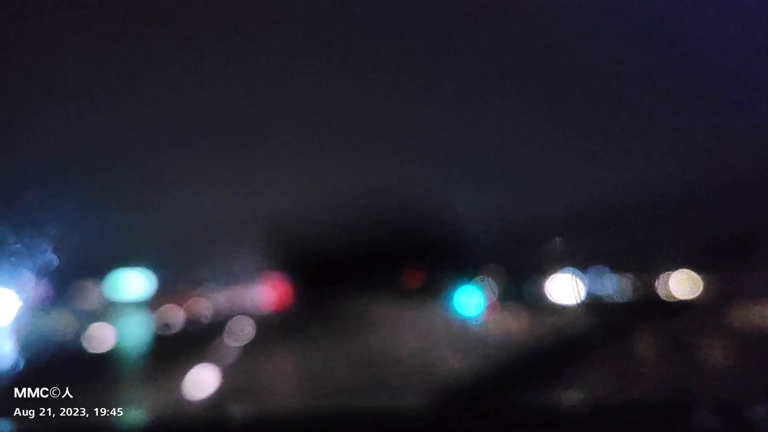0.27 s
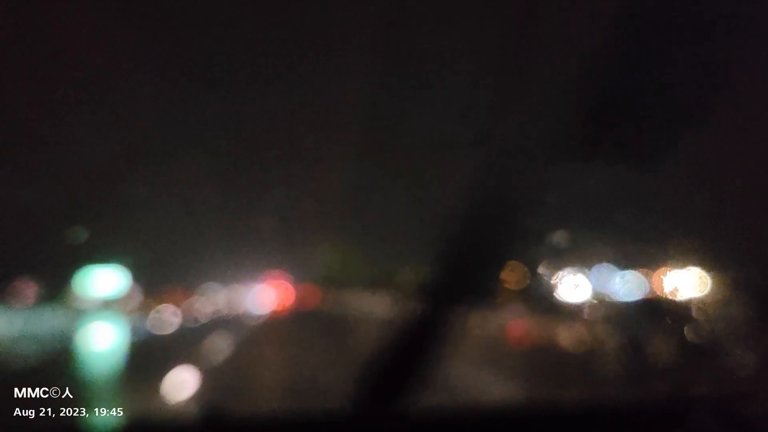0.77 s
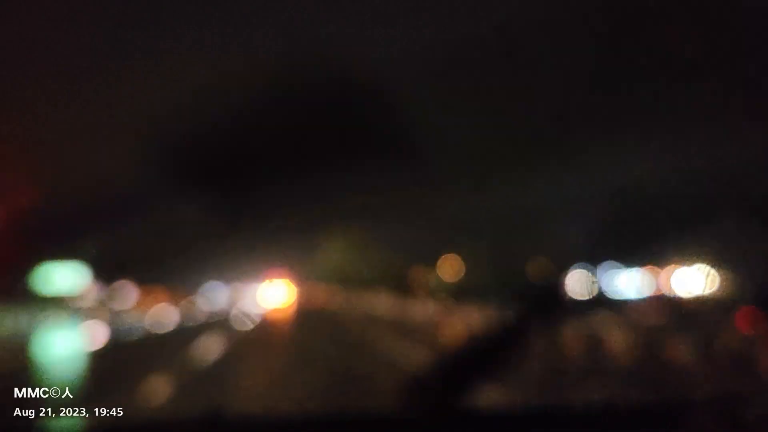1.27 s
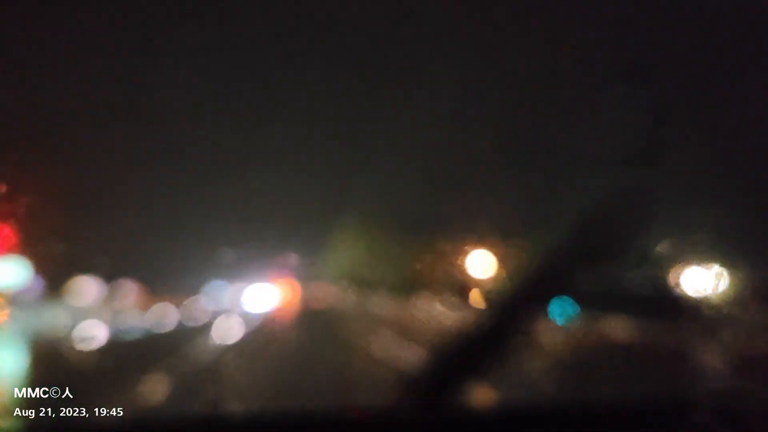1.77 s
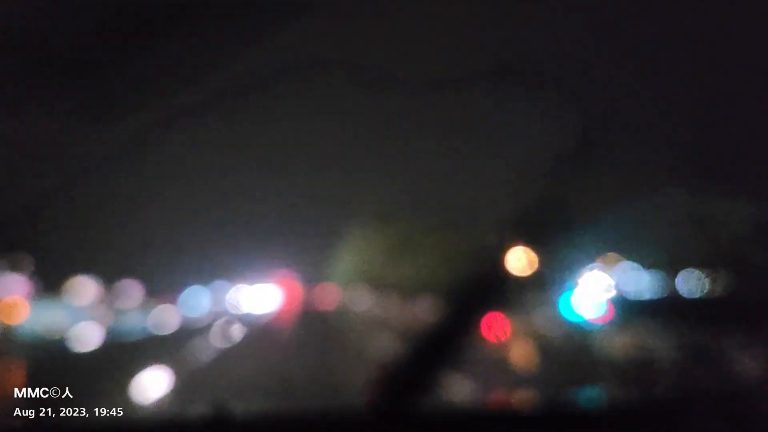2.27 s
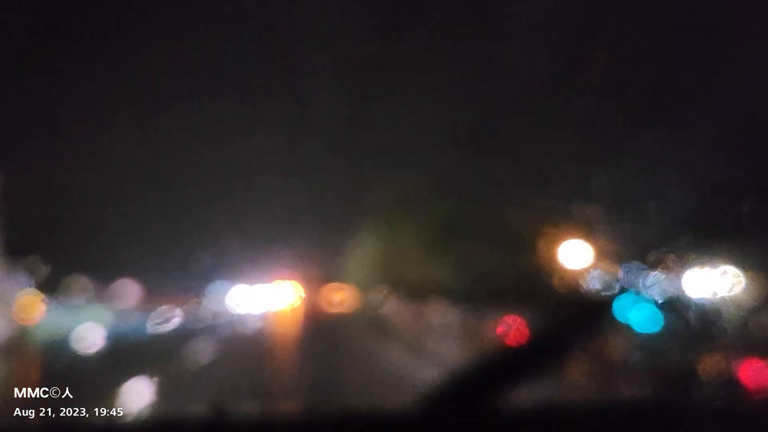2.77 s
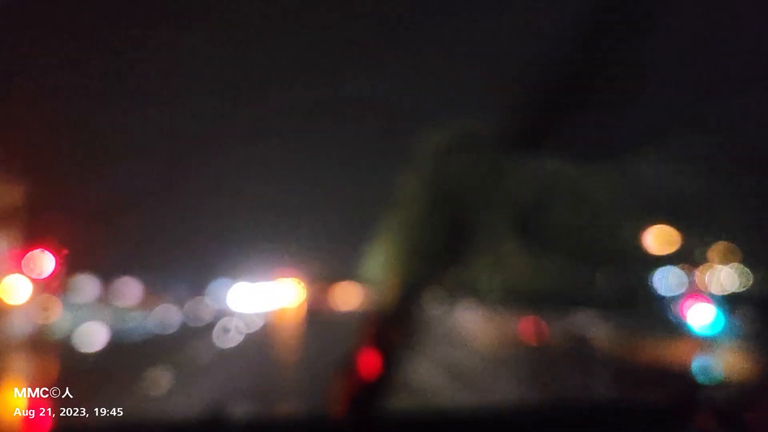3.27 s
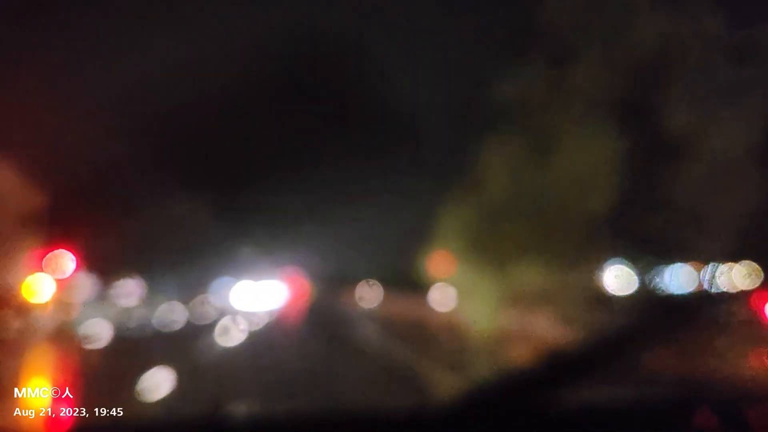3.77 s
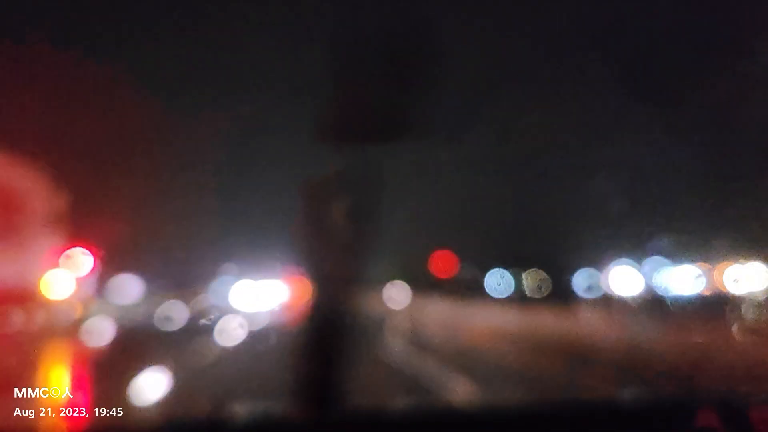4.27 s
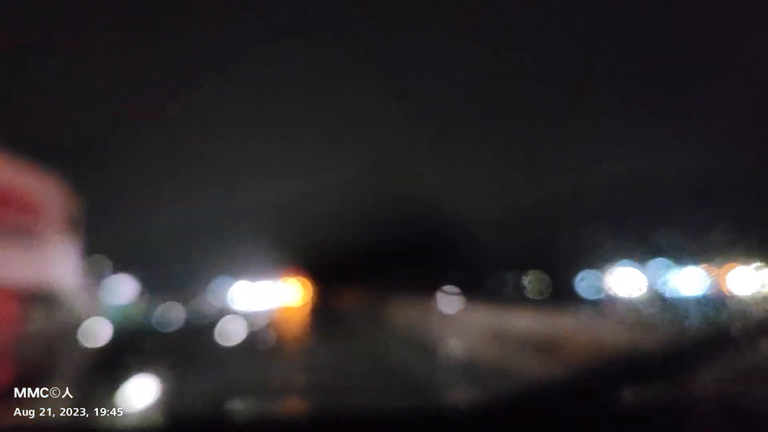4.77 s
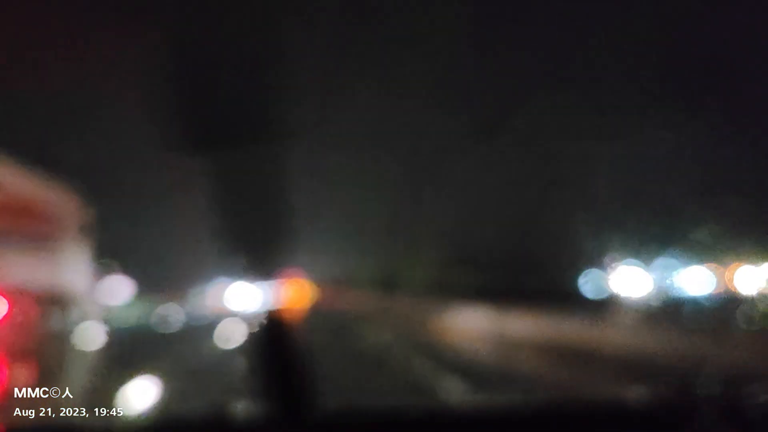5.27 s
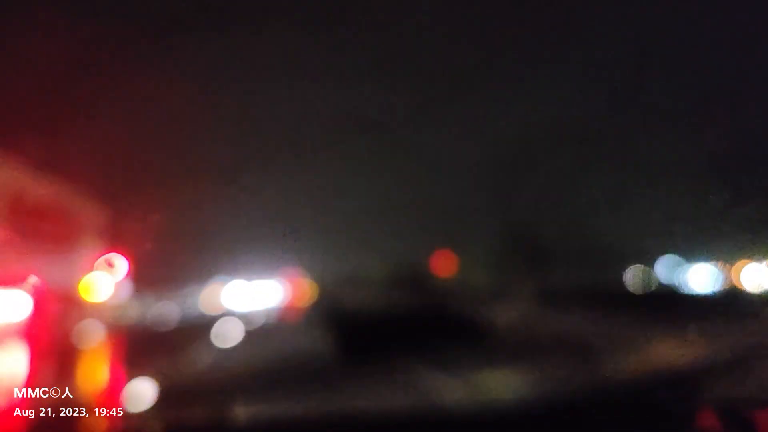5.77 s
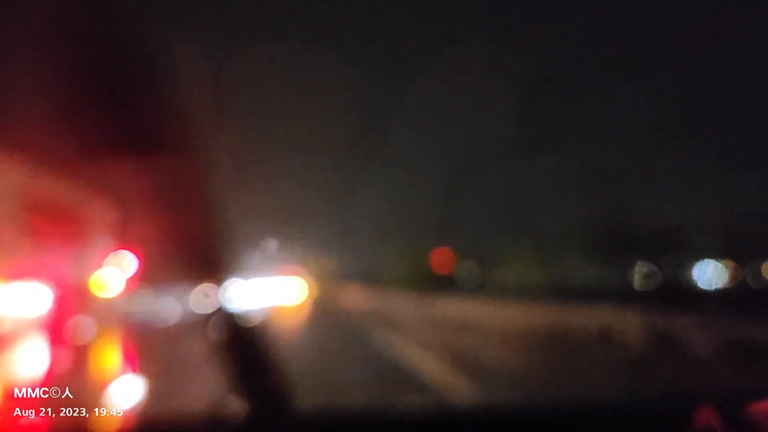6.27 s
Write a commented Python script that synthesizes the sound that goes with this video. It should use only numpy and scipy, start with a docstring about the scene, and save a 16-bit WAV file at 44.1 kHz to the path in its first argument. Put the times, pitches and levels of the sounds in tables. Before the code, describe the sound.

Inside a car driving through a downpour, dense drops patter on metal and glass while deep rumbles swell and fade with bumps.

```python
"""Inside the cabin of a moving car at night, in heavy rain.
Countless drops, made as short random bursts, drum on the roof and spatter on the glass; a few large ones tick.
Rough stretches of wet road make a noise rumble swell and fade, with firm thumps from damped tones.
Narrow noise booms as the car heaves, and a wavering tone drones and throbs underneath.
The tyres roar as shaped noise, and early on a faint low tone glides down and back up."""
import sys
import numpy as np
from scipy import signal
from scipy.fft import rfft, irfft
from scipy.io import wavfile
from scipy.ndimage import uniform_filter1d

SR = 44100
rng = np.random.default_rng(int(sys.argv[2]) if len(sys.argv) > 2 else 0)


def materialize(psi):
    """Save the field psi as 16-bit PCM at rate SR to the path in sys.argv[1].

    A 1-D psi becomes a single channel; in a 2-D psi each row is a channel.
    """
    bounded = np.clip(np.atleast_2d(psi).T, -1, 1)
    quanta = np.round(bounded * 32767).astype(np.int16)
    wavfile.write(sys.argv[1], SR, quanta)


N = 286650  # length in samples: 6.5 s

TIME, FREQS = np.arange(N) / SR, np.fft.rfftfreq(N, 1 / SR)  # s, Hz
BURST_TIME = np.arange(600) / SR  # s

# Levels are relative: the functions below may add a fixed number of dB.
# rain heard through the roof: (frequency [Hz], level per Hz [dB])
ROOF_COLOUR = [(200, -34), (420, -7), (520, 2.5), (600, -2), (680, -8), (870, -4.5), (1000, -3), (1200, -1),
               (1330, -6), (1680, -8), (2100, -5.5), (2550, -8), (3300, -11.5), (4500, -32.5), (7000, -56)]
# rain heard through the glass: (frequency [Hz], level per Hz [dB])
GLASS_COLOUR = [(1500, -5.5), (3000, -6.5), (4200, 3.5), (4900, -1), (6600, 1), (7200, -3.5), (7900, -11),
                (9000, -10), (9800, -7.5), (10500, -17.5), (11600, -6.5), (12050, -40), (12800, -52),
                (15500, -60)]
# resonances of the car's panels: (frequency [Hz], width [Hz], lift [dB])
PANELS = [(736.5, 54, 7), (977, 48, 3.5), (1047, 110, 4), (1150, 65, 3.5), (1467, 110, 3.5),
          (1784, 26, 3.5), (1875, 94, 4), (3280, 730, 3.5), (6430, 520, 1.5), (8250, 190, 5.5)]
# gusts of harder rain: (peak time [s], half length [s], lift on the glass [dB])
GUSTS = [(1.15, 0.54, 1.5), (2.422, 0.14, 1.5), (2.918, 0.11, 0.5), (3.845, 0.08, 2.0), (4.196, 0.099, 2.7),
         (4.628, 0.086, 2), (5.248, 0.13, 1.2), (5.81, 0.09, 1)]
ROOF_DB, GLASS_DB = -32, -38.5  # drumming and spatter between gusts
ROOF_GUST_SHARE = 0.47  # the roof gets this share of a gust's lift
# the finest spray lies above SPRAY_HZ; it gets an extra share of each gust, and flickers
SPRAY_HZ, SPRAY_GUST_SHARE, SPRAY_FLICKER_DB = 7000, 0.4, 1.07

# large drops on the windshield:
# (time [s], level [dB], extra level of the splash [dB], left over right [dB])
TICKS = [(0.0329, -14.5, -4.5, 5), (1.0256, -22.5, -3, 4), (1.0668, -23, -7, -1), (1.4704, -29, -9, 4),
         (1.651, -32, -5, 5), (2.626, -35, 5, -3), (2.8247, -28.5, 1.5, 7), (2.9302, -25.5, -10, 9),
         (2.9703, -30, 1, 3), (4.1353, -22, -7, 3), (5.359, -31, -1, 8), (6.3038, -24, -18, -2)]
# a large drop's knock on the pane: (frequency [Hz], level per Hz [dB])
KNOCK_COLOUR = [(900, -15), (1700, 0), (2600, 8), (3600, 4.5), (4800, 0), (6400, 2), (8000, -13),
                (13000, -58)]
# a large drop's bright splash: (frequency [Hz], level per Hz [dB])
SPLASH_COLOUR = [(3000, -6), (6500, -2.5), (8300, 2), (10000, -2.5), (12000, -10), (15500, -42)]
KNOCK_DECAY_S, SPLASH_DECAY_S = 0.00096, 0.00072
KNOCK_LAG_S = 0.0007  # the pane answers just after the splash

# bumps in the road: (time [s], level [dB], pitch of the thump [Hz])
BUMPS = [(0.29, -22, 243), (0.455, -13.5, 202), (1.586, -16, 246), (1.658, -24, 163), (1.76, -20, 227),
         (1.992, -19, 229), (2.346, -16, 231), (2.539, -12, 154), (2.604, -14.5, 175), (3.137, -15.5, 230),
         (3.522, -16, 208), (3.867, -14, 165), (3.92, -13, 231), (3.964, -16, 174), (4.218, -7.5, 135),
         (4.26, -16.5, 215), (4.358, -9.5, 148), (4.403, -10.5, 100), (4.527, -15, 159), (4.585, -8, 88),
         (4.636, -15.5, 182.6), (4.672, -13.5, 62), (5.129, -15, 226), (5.26, -11.5, 244),
         (5.325, -11, 191), (5.504, -11.5, 164), (5.695, -15.5, 252), (5.89, -9, 133), (5.925, -9.5, 172.6),
         (6.035, -10.5, 216), (6.051, -2.5, 78), (6.115, -12, 200.5), (6.326, -9.5, 133)]
# rough stretches of road:
# (start [s], length [s], shaking [dB], lift of its upper rattle [dB])
ROUGH_STRETCHES = [(-0.04, 0.073, -21, 8.5), (0.428, 0.14, -26, 1), (1.134, 0.47, -29, -10),
                   (1.533, 0.51, -23, 2.5), (2.39, 0.56, -23, 1), (3.075, 0.59, -29, -3),
                   (3.78, 0.25, -24.5, 7), (4.162, 0.5, -22.5, 2), (5.08, 0.32, -23, 5.5),
                   (5.386, 0.22, -24, 3), (5.66, 0.21, -27, 4), (5.83, 0.33, -20.5, -1),
                   (6.212, 0.22, -23, 1)]
SMOOTH_DB = -35.5  # shaking on the smooth road, always present
ROUGH_RISE_S, ROUGH_FADE_S = 0.052, 0.039
# rumble of the shaken body: (frequency [Hz], level per Hz [dB])
RUMBLE_COLOUR = [(8, -42), (16, 6.5), (28, -13), (48, -2), (78, 5), (103, 3), (130, 0.5), (185, -3),
                 (260, -10), (350, -15), (470, -20.5), (620, -24.5), (900, -28), (1500, -96.5)]
RATTLE_HZ = 328  # the upper rattle lies above this
LUMPS_DB, LUMPS_PER_S = 2.5, 18  # the rumble comes in uneven lumps
# deep shudder of the body on rough road: (frequency [Hz], width [Hz], level [dB])
SHUDDER = (31, 26, -6.5)
# booming resonance of the body: (frequency [Hz], width [Hz], level [dB])
BOOM = (45.9, 7.2, -0.6)
# the body heaves on its springs: (peak time [s], half length [s], level [dB])
HEAVES = [(0.123, 0.094, -18), (0.413, 0.093, -18), (0.896, 0.23, -27), (1.11, 0.05, -18.5),
          (1.338, 0.062, -17), (1.677, 0.036, -13.5), (1.85, 0.039, -12.5), (2, 0.047, -14.5),
          (2.255, 0.17, -23.5),  (2.877, 0.05, -16), (3.497, 0.094, -25), (3.74, 0.038, -22),
          (3.968, 0.33, -20.5), (4.297, 0.035, -13.5), (4.406, 0.014, -9), (4.582, 0.045, -18),
          (4.682, 0.018, -11.5), (5.305, 0.042, -13.5), (5.454, 0.028, -14), (5.78, 0.076, -22.5),
          (6.027, 0.05, -13.5), (6.44, 0.024, -17)]
BOOM_FROM_ROAD_DB = -3.5  # the share of the shaking that feeds the boom

# low drone of the drive: (time [s], level [dB])
DRONE_LEVEL = [(0.0, -22.5), (0.5, -45), (0.95, -52), (1.2, -29), (1.45, -45), (1.75, -18.5), (2.1, -29.5),
               (2.7, -18.5), (3.05, -31.5), (3.7, -24), (4.12, -37), (4.55, -20.5), (4.74, -43),
               (5.25, -21.5), (6.5, -30)]
# pitch of the drone: (time [s], pitch [Hz])
DRONE_PITCH = [(0.0, 102.1), (2.2, 101.4), (6.5, 104.1)]
# throbs of the drone: (peak time [s], half length [s], level [dB])
THROBS = [(0.295, 0.026, -19.5), (1.703, 0.035, -13.5), (1.955, 0.065, -18), (2.295, 0.07, -25),
          (2.462, 0.02, -18), (2.59, 0.045, -16.5), (2.888, 0.041, -14.5), (3.28, 0.13, -21.5),
          (3.52, 0.036, -17.5), (3.915, 0.099, -15), (4.35, 0.04, -16), (5.876, 0.039, -15)]
# roar of the tyres: (time [s], level of its low part [dB], level of its upper part [dB])
TYRE_LEVELS = [(0.0, -28, -32), (0.68, -27, -29.5), (0.82, -28, -44), (0.94, -31, -52), (1.03, -31, -27.5),
               (1.55, -28, -26), (2.0, -24.5, -26), (2.1, -26, -32), (2.9, -25.5, -27.5),
               (3.05, -26.5, -31.5), (3.8, -31.5, -26.5), (4.3, -23, -27.5), (4.7, -33, -23),
               (4.8, -37, -30.5), (5.02, -34.5, -32.5), (5.15, -26, -26.5), (6.5, -28.5, -30)]
# colour of the tyre roar: (frequency [Hz], level per Hz [dB])
ROAR_COLOUR = [(140, -32), (185, -5.5), (220, 2), (262, -0.5), (290, -4), (345, -3), (420, -14.5),
               (700, -58.5)]
ROAR_SPLIT_HZ = 264  # the upper part of the roar lies above this
# resonance of the air in the tyres: (frequency [Hz], width [Hz], level [dB])
TYRE_AIR = (255, 3, 0)
# a faint low tone that glides down and back up: (time [s], pitch [Hz], level [dB])
GLIDE = [(0.62, 257.7, -73), (0.72, 256, -29.5), (0.97, 196, -34), (1.2, 191.6, -47), (1.35, 214.9, -24.5),
         (1.47, 243.6, -27.5), (1.62, 251, -69)]

# the cabin's sound at the two ears:
# (frequency [Hz], gain of the left-right difference [dB], left over right [dB])
EARS = [(250, -76, 0.0), (350, -24.5, 23), (452, -4, 2), (530, -2, -3.5), (666, 9.5, 1.5), (765, 3.5, -6.5),
        (870, 7, 0.5), (1073, 3, -13.5), (1282, 1.5, 8), (1440, 7, -4.5), (1660, 2.5, 2.5),
        (1900, 0.5, 0.5), (3070, 2.0, -2.5), (4600, 0, -4), (5950, 1, -2), (6800, 0, -6.5), (8200, 1, 5.5),
        (9500, -0.5, -1.5), (11400, 0.5, -2.5)]
EDGE_HZ = 15800  # the sound is cut above this


def roof():
    """Dense drops drum on the roof and bonnet and ring the panels."""
    rings = burst(decay_s=0.0015, tail_s=0.0083, tail_db=-2.5, count=400)
    left = drops(rings, per_s=3500, spread_db=2.5, cap=7.0)
    right = drops(rings, per_s=3500, spread_db=2.5, cap=7.0)
    drumming = colour(mid_side(left, right), read(ROOF_COLOUR, FREQS) + lifts(PANELS))
    return rainfall(ROOF_DB, ROOF_GUST_SHARE) * evened(drumming)


def windshield():
    """Drops spatter on the glass, sparser on the left, over the steady noise of fine spray."""
    left_rings = burst(decay_s=0.0014, tail_s=0.018, tail_db=-11, count=400)
    right_rings = burst(decay_s=0.0019, tail_s=0.0069, tail_db=-15, count=400)
    left = drops(left_rings, per_s=1300, spread_db=2.5, cap=7.3)
    right = drops(right_rings, per_s=2200, spread_db=2.5, cap=8.2)
    water = evened(mid_side(left, right)) + amp(2.0) * noise()
    water = evened(colour(water, read(GLASS_COLOUR, FREQS) + lifts(PANELS)))
    spatter = below(water, SPRAY_HZ)
    flicker_db = SPRAY_FLICKER_DB * wander(rate_hz=11)
    spray = (water - spatter) * rainfall(flicker_db, SPRAY_GUST_SHARE)
    return rainfall(GLASS_DB, 1) * (spatter + spray)


def patter(low_hz=1200, high_hz=4800, decay_s=0.009, flurry_db=1.2, count=400):
    """Nearer drops tap the roof in flurries, each with a brief pitch of its own."""
    hz = np.geomspace(low_hz, high_hz, count)[:, None]
    t = np.arange(SR // 30) / SR
    # higher pitches are weaker
    rings = np.sin(2 * np.pi * hz * t) * np.exp(-t / decay_s) * np.sqrt(low_hz / hz)
    left = drops(rings, per_s=200, spread_db=4, cap=2.7)
    right = drops(rings, per_s=200, spread_db=4, cap=2.7)
    taps = colour(mid_side(left, right), lifts(PANELS))
    taps = evened(taps * amp(flurry_db * wander(rate_hz=9.8)))
    return amp(-9.5) * rainfall(ROOF_DB, ROOF_GUST_SHARE) * taps


def ticks(knock_db=19, splash_db=18):
    """Each large drop splashes brightly and knocks on the pane."""
    knocks, splashes = np.zeros((2, 2, N))
    for s, db, treble_db, pan_db in TICKS:
        gain = amp(db + np.array([[pan_db], [-pan_db]]) / 2)
        knock = burst(decay_s=KNOCK_DECAY_S, tail_s=0.008, tail_db=-12, count=2)
        splash = burst(decay_s=SPLASH_DECAY_S, tail_s=0.0065, tail_db=-10, count=2)
        add(knocks, s + KNOCK_LAG_S, gain * amp(knock_db) * knock)
        add(splashes, s, gain * amp(splash_db + treble_db) * splash)
    knock_shape = read(KNOCK_COLOUR, FREQS)
    splash_shape = read(SPLASH_COLOUR, FREQS) + lifts(PANELS)
    # dividing by each filter's average gain keeps the levels set above
    knocks = colour(knocks, knock_shape) / np.sqrt(np.mean(amp(knock_shape) ** 2))
    splashes = colour(splashes, splash_shape) / np.sqrt(np.mean(amp(splash_shape) ** 2))
    return knocks + splashes


def rainfall(db, share):
    """Gain of the rain over time, lifted by a share of each gust."""
    return amp(db + share * sum(lift * swell(s, half_s) for s, half_s, lift in GUSTS))


def drops(rings, per_s, spread_db, cap):
    """Drops land at random on many spots, each with its own ring; most are small, a few large."""
    at = np.flatnonzero(rng.random(N) < per_s / SR)
    size = amp(spread_db * np.minimum(rng.exponential(1, N), cap))
    size = (size * rng.choice([-1, 1], N))[at]
    spot = rng.integers(0, len(rings), N)[at]
    out = np.zeros(N + rings.shape[1])
    # lay down all drops together, one sample of their rings at a time
    for delay, ring in enumerate(rings.T.copy()):
        out[at + delay] += size * ring[spot]
    return evened(out[:N])


def burst(decay_s, tail_s, tail_db, count):
    """Impacts of unit energy: a short crack of noise and the cabin's fainter, longer tail."""
    fade = np.exp(-BURST_TIME / decay_s) + amp(tail_db) * np.exp(-BURST_TIME / tail_s)
    blows = rng.standard_normal((count, len(BURST_TIME))) * fade
    return blows / np.linalg.norm(blows, axis=1, keepdims=True)


def bumps(rise_s=0.0077, level_db=-2.5, upper_ratio=1.682, upper_db=-10):
    """Each bump gives the body a firm, quickly damped thump with a shorter upper knock."""
    out, t = np.zeros(N), np.arange(SR // 8) / SR
    push = t / rise_s * np.exp(1 - t / rise_s)
    for s, db, hz in BUMPS:
        turn = 2 * np.pi * hz * t
        thump = push * np.sin(turn)
        knock = amp(upper_db) * push ** 2 * np.sin(upper_ratio * turn)
        add(out, s, amp(db + level_db) * (thump + knock))
    return out


def road():
    """Rough road shakes the body; it rumbles, shudders and booms under the drone."""
    shake = shaking(0)
    heaves = sum((amp(db) * swell(s, half_s)) ** 2 for s, half_s, db in HEAVES)
    heave = np.sqrt((amp(BOOM_FROM_ROAD_DB) * shake) ** 2 + heaves)
    body = steadied(colour(noise(), read(RUMBLE_COLOUR, FREQS)), span_s=0.04, share=1.0)
    body = evened(body * amp(LUMPS_DB * wander(rate_hz=LUMPS_PER_S)))
    low = below(body, RATTLE_HZ)
    rattle = body - low
    out = amp(2.0) * (low * shake + rattle * shaking(0.88))
    out += ringing(BOOM, span_s=0.038, share=1.0) * heave
    out += ringing(SHUDDER, span_s=0.044, share=0.99) * shake
    out[0] += drone()  # row 0 is the mid: alike at both ears
    return out


def shaking(rattle_share):
    """How hard the road shakes the car: each rough stretch rises, holds and dies away."""
    power = amp(SMOOTH_DB) ** 2
    for s, length, db, lift_db in ROUGH_STRETCHES:
        rise = np.clip((TIME - s) / ROUGH_RISE_S, 0, 1)
        fade = np.exp(-np.maximum(TIME - s - length, 0) / ROUGH_FADE_S)
        power = power + (amp(db + rattle_share * lift_db) * rise * fade) ** 2
    return np.sqrt(power)


def drone(waver_hz=0.6, flutter_db=1.0):
    """The drive's held low tone wavers a little and swells in separate throbs."""
    s, hz = np.transpose(DRONE_PITCH)
    pitch = np.interp(TIME, s, hz) + waver_hz * wander(rate_hz=4.7)
    tone = np.sin(2 * np.pi * np.cumsum(pitch) / SR)
    tone = evened(tone * amp(flutter_db * wander(rate_hz=11)))
    throbs = sum((amp(db) * swell(s, half_s)) ** 2 for s, half_s, db in THROBS)
    return tone * np.sqrt(follow(DRONE_LEVEL, column=1) ** 2 + throbs)


def tyres():
    """The tyres roar on the wet road as shaped noise, and the air inside them sings."""
    roar = colour(noise(), read(ROAR_COLOUR, FREQS))
    low = below(roar, ROAR_SPLIT_HZ)
    air = ringing(TYRE_AIR, span_s=0.3, share=0.72)
    lower = amp(-7.5) * (steadied(low, span_s=0.073, share=0.59) + air)
    upper = amp(-7.0) * steadied(roar - low, span_s=0.11, share=0.79)
    return lower * follow(TYRE_LEVELS, column=1) + upper * follow(TYRE_LEVELS, column=2)


def glide(waver_hz=3, flutter_db=4.0):
    """A faint, unsteady low tone glides down and back up."""
    s, hz, _ = np.transpose(GLIDE)
    pitch = np.interp(TIME, s, hz) + waver_hz * wander(rate_hz=11)
    tone = np.sin(2 * np.pi * np.cumsum(pitch) / SR)
    return follow(GLIDE, column=2) * evened(tone * amp(flutter_db * wander(rate_hz=15)))


def ringing(mode, span_s, share):
    """One resonance kept sounding by random shaking: noise narrowed around its frequency."""
    hz, width, db = mode
    shape = 1 / (1 + ((FREQS - hz) / width) ** 2) ** 1.5
    return amp(db) * steadied(irfft(rfft(noise()) * shape, N), span_s, share)


def amp(db):
    """Decibels to a plain gain."""
    return 10 ** (np.asarray(db) / 20)


def evened(x):
    """Scales a sound to an average (rms) strength of 1."""
    return x / np.sqrt(np.mean(x ** 2) + 1e-20)


def read(points, hz, column=1):
    """A spectrum table joined on a log-frequency axis."""
    rows = np.array(points)
    return np.interp(np.log(hz + 1), np.log(rows[:, 0] + 1), rows[:, column])


def follow(table, column):
    """Gain over time from one dB column of a table."""
    rows = np.array(table)
    return amp(np.interp(TIME, rows[:, 0], rows[:, column]))


def colour(x, db):
    """Filter with the given gain on FREQS; it rings after a blow, not before."""
    cepstrum = irfft(np.log(amp(np.maximum(db, -100))), N)
    # folding the cepstrum forward in time gives the filter its minimum phase
    cepstrum[1:N // 2] *= 2
    cepstrum[N // 2 + 1:] = 0
    return irfft(rfft(x) * np.exp(rfft(cepstrum)), N)


def lifts(modes):
    """Resonance bumps in dB on FREQS."""
    return sum(db / (1 + (2 * (FREQS - hz) / width) ** 2) for hz, width, db in modes)


def below(x, hz):
    """The part of a sound under the given frequency, with a soft edge."""
    return irfft(rfft(x) / (1 + (FREQS / hz) ** 6), N)


def steadied(x, span_s, share):
    """Takes a share of the slow chance swells out of a noise."""
    size = max(int(span_s * SR), 2)
    power = uniform_filter1d(uniform_filter1d(x ** 2, size), size)
    return evened(x / (abs(power) + 1e-12) ** (np.clip(share, 0, 1) / 2))


def noise():
    """Two unrelated noises: the mid and side parts of a sound from all around."""
    return rng.standard_normal((2, N))


def wander(rate_hz):
    """A slow random curve of rms 1, moving up to about the given rate."""
    return evened(irfft(rfft(rng.standard_normal(N)) / (1 + (FREQS / rate_hz) ** 4), N))


def swell(peak_s, half_s):
    """A smooth rise and fall of height 1."""
    return np.exp(-((TIME - peak_s) / half_s) ** 2)


def mid_side(left, right):
    """Two ears as half their sum and half their difference."""
    return np.array([left + right, left - right]) / 2


def add(mix, s, sound):
    """Lays a sound into the mix at time s, cut off at the end of the mix."""
    part = mix[..., round(s * SR):][..., :sound.shape[-1]]
    part += sound[..., :part.shape[-1]]


def scene():
    """The bass reaches both ears alike; the rain comes from all around."""
    mid, side = roof() + windshield() + patter() + road() + tyres() + glide()
    # sound crossing the cabin reaches the ears out of step, most of all near 700 Hz
    side = irfft(rfft(side) * amp(read(EARS, FREQS, column=1)), N)
    lean_db = read(EARS, FREQS, column=2) * (FREQS > 400)
    lean = amp(np.array([[1], [-1]]) * lean_db / 2)
    lean = lean / np.sqrt(np.mean(lean ** 2, 0))  # keeps the summed gain power of the ears
    cabin = irfft(rfft([mid + side, mid - side]) * lean, N)
    return cabin + ticks() + bumps()


def record(dry):
    """Cuts the highest treble with a steep low-pass filter."""
    low_pass = signal.firwin(511, EDGE_HZ, window=("kaiser", 9), fs=SR)
    return signal.oaconvolve(dry, low_pass[None], "same")


dry = scene()
out = record(dry)
materialize(out)
```